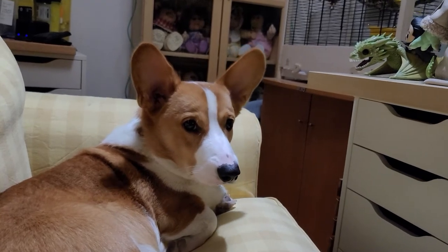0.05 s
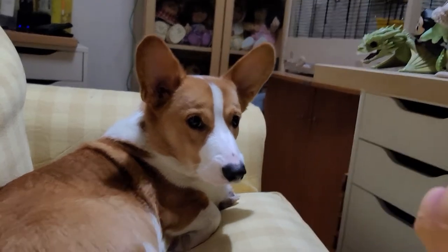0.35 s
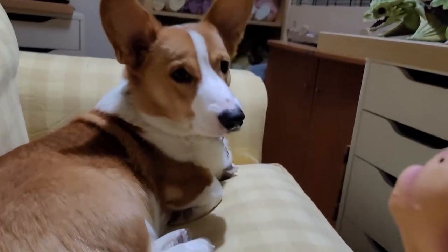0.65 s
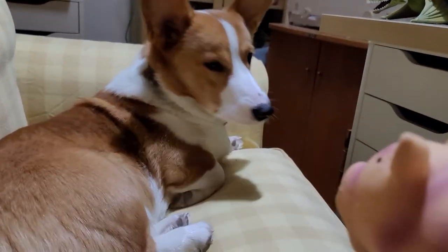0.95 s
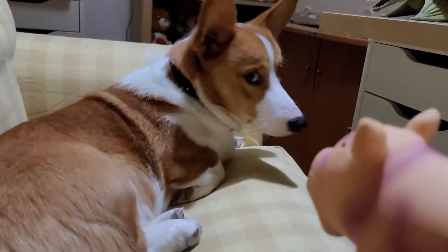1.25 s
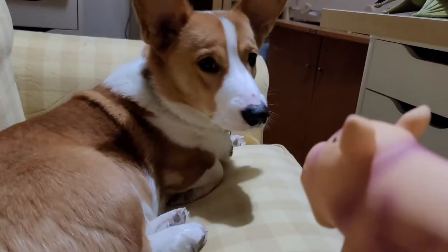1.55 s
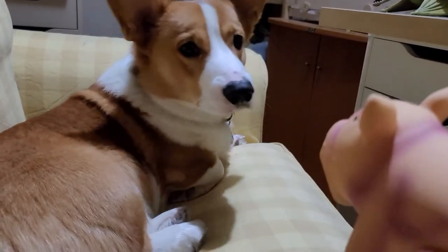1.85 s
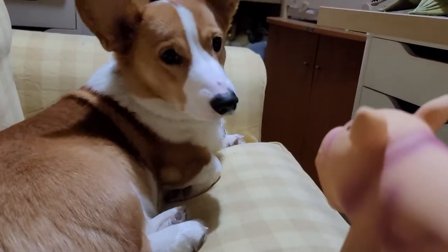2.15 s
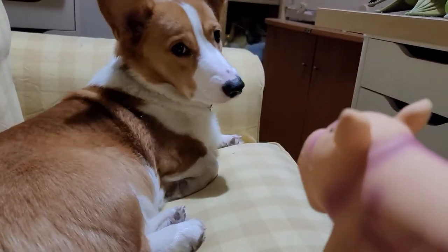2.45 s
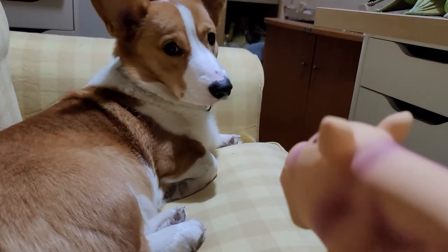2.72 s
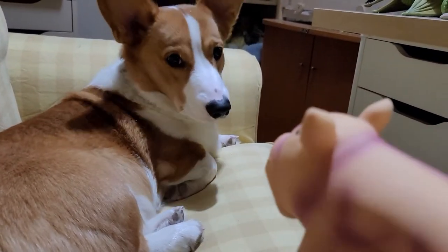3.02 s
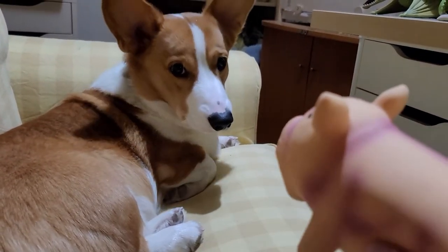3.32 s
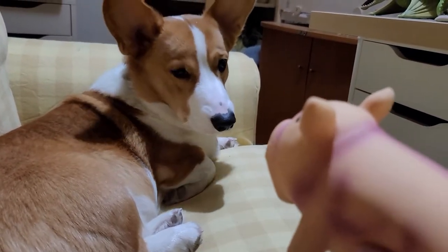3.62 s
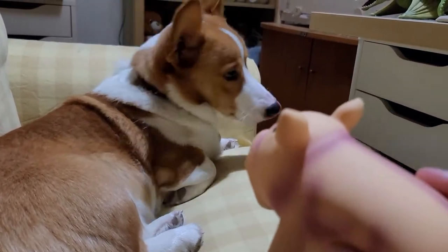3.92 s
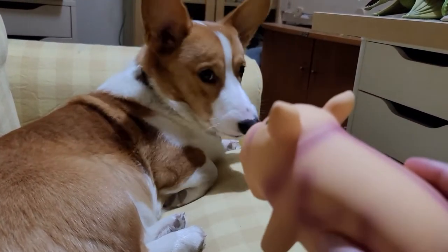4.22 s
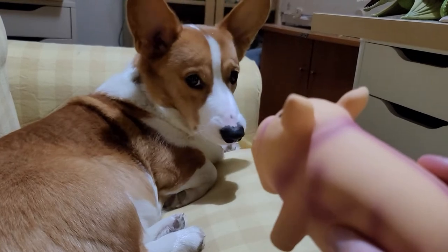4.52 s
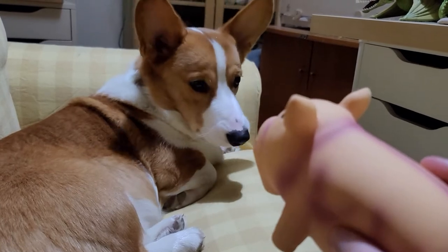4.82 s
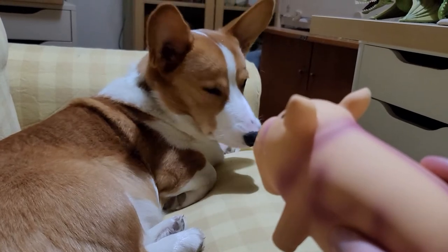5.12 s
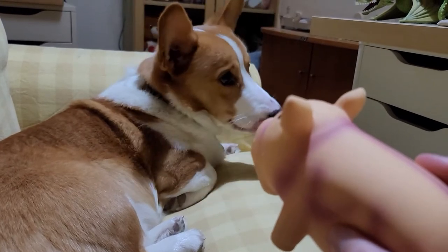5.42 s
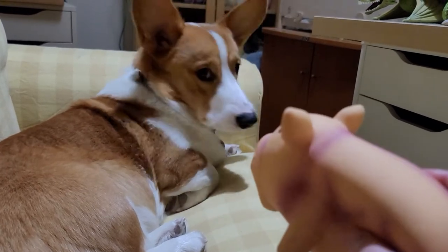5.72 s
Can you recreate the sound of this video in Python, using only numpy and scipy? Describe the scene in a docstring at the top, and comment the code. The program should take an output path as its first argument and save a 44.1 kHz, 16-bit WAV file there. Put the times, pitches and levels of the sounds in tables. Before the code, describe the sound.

A faint low hum fills a small living room throughout. Short, high, kiss-like squeaks come from slightly left, with a little room echo; each whistles downward and breaks into a wet, airy rasp. They fall right at the start, around 0.8 to 1.0 seconds, and near 1.5, 1.9 and 2.4 seconds, with faint sleeve brushes and small smacks between them. At 2.6 seconds a hand knocks softly on a hollow rubber pig toy, and at 2.7 seconds squeezes it close to the microphone: a dry tick and one short, low, buzzy oink with a raspy edge, standing out above the rest. Another cluster of chirps and squeaks runs from 3.4 to 3.8 seconds. A sharp smack follows at 4.0 seconds, then only a few faint smacks and ticks. At about 5.6 seconds the pig gives a second brief oink.

```python
"""A low hum fills a small living room. From the start, kiss-like squeaks come from one side: air forced
through a narrow wet slit whistles in falling glides, then breaks into a rasp. Soft knocks, a brushing
sleeve and small smacks fill the gaps. At 2.7 s a hand squeezes a rubber pig close by: its reed slaps
about 90 times a second and rings a short tube, giving an oink. More squeaks follow until about 3.8 s,
then a few smacks and ticks, and at 5.6 s the pig oinks again."""
import sys
import numpy as np
from scipy import signal
from scipy.fft import rfft, irfft, next_fast_len
from scipy.io import wavfile
from scipy.ndimage import uniform_filter1d, map_coordinates

SR = 44100
rng = np.random.default_rng(int(sys.argv[2]) if len(sys.argv) > 2 else 0)


def log_audio(samples):
    """Write samples as a 16-bit WAV file to the path given in sys.argv[1]."""
    # one column per channel
    frames = np.atleast_2d(samples).T
    # limit to full scale, then quantise
    limited = np.clip(frames, -1, 1)
    pcm = np.round(limited * 32767).astype(np.int16)
    wavfile.write(sys.argv[1], SR, pcm)


N = 258856
TIME = np.arange(N) / SR
TOP_HZ = 15900
OPPOSITE = np.array([[1], [-1]])  # adds on the left, subtracts on the right


def gain(db):
    """Turn decibels into a multiplier."""
    return 10 ** (np.asarray(db) / 20)


def unit(x):
    """Scale to an average strength (rms) of 1."""
    return x / np.sqrt(np.mean(x ** 2))


def add(track, s, sound):
    """Mix a sound into a track, starting at s seconds."""
    start = max(int(s * SR), 0)
    track[start:start + len(sound)] += sound[:max(N - start, 0)]


def delay(x, ms):
    """Make a sound late, even by part of a sample."""
    return map_coordinates(x, [np.arange(N) - ms * SR / 1000], order=3)


def resonate(x, hz, width):
    """Let a sound ring around one pitch by filtering it twice."""
    g, k = np.tan(np.pi * min(hz, TOP_HZ) / SR), width / hz
    b, a = [g * k, 0, -g * k], [1 + g * k + g * g, 2 * (g * g - 1), 1 - g * k + g * g]
    return signal.lfilter(b, a, signal.lfilter(b, a, x))


def colour(x, points):
    """Shape noise from bass to treble along (frequency [Hz], level [dB]) points."""
    hz, db = np.transpose(points)
    size = next_fast_len(N)
    bins = np.maximum(np.fft.rfftfreq(size, 1 / SR), 1)
    curve = gain(np.interp(np.log(bins), np.log(hz), db))
    return unit(irfft(rfft(x, size) * curve, size)[..., :N])


def wander(hz, size=N):
    """Drift to a new random value hz times a second."""
    steps = np.arange(size) * hz / SR
    targets = rng.standard_normal(int(steps[-1]) + 2)
    return unit(np.interp(steps, np.arange(len(targets)), targets))


def swell(peak, rise, fall):
    """A loudness curve that opens quickly, lingers at its peak and fades."""
    before, after = np.maximum(peak - TIME, 0) / rise, np.maximum(TIME - peak, 0) / fall
    return np.exp(-np.minimum(before ** 4 + after ** 2, 20))


def bursts(table):
    """Sudden puffs of noise, each ringing around one pitch and dying away."""
    out, t = np.zeros(N), TIME[:SR // 3]
    for s, db, decay, hz, width in table:
        burst = resonate(rng.standard_normal(len(t)) * np.exp(-t / decay), hz, width)
        add(out, s, gain(db) * burst / np.sqrt(np.sum(burst ** 2) / (decay * SR)))
    return out


# The tone of the room's noise: (frequency [Hz], relative level [dB])
HUM_COLOUR = [(15, -17.5), (25, -11.5), (42, 3), (63, -14.5), (90, -8), (150, -8.5), (230, -9.5),
              (330, -8.5), (640, -19.5), (1400, -22.5), (2100, -29), (6000, -41.5), (8400, -41),
              (9500, -52), (15500, -44)]
# Low notes at which the room rings: (pitch [Hz], width [Hz], level [dB])
ROOM_NOTES = [(79.8, 6.2, -68.5), (154.5, 23, -65), (316, 68, -70.5)]
def hum(level_db=-61, wander_db=1, apart_hz=900, bass_side=.2):
    """Low room noise with a few ringing notes; left and right differ mostly in the treble."""
    middle, side = colour(rng.standard_normal((2, N)), HUM_COLOUR) * gain(level_db + wander_db * wander(6))
    treble = signal.sosfilt(signal.butter(1, apart_hz, "high", fs=SR, output="sos"), side)
    notes = sum(gain(db) * unit(resonate(rng.standard_normal(N), hz, width))
                for hz, width, db in ROOM_NOTES)
    return middle + notes + (bass_side * side + 1.1 * treble) * OPPOSITE


def whistle(length, start_hz, end_hz, roughness, fade_db=0, bend=1.4, wobble=.08, wobble_hz=800,
            flutter_db=5.5, flutter_hz=500, overtone_db=-29, air_db=-11):
    """A tone that slides, then settles. Roughness (start, end) shakes it and lets air through."""
    progress = np.linspace(0, 1, int(length * SR))
    size, longest = len(progress), SR // 8
    rough = np.interp(progress, [0, 1], roughness)
    glide = end_hz + (start_hz - end_hz) * (1 - progress) ** bend
    hz = glide * (1 + wobble * rough * wander(wobble_hz, longest)[:size])
    phase = 2 * np.pi * np.cumsum(hz) / SR
    overtones = sum(np.sin(k * phase) * wander(wobble_hz, longest)[:size] * (k * hz < SR / 2)
                    for k in (2, 3))
    air = rough * unit(resonate(rng.standard_normal(longest)[:size], end_hz, width=.9 * end_hz))
    arch = np.sqrt(np.abs(np.sin(np.pi * progress)))  # fades in and out
    flutter = gain(flutter_db * rough * wander(flutter_hz, longest)[:size])
    tone = np.sin(phase) + arch * (gain(overtone_db) * overtones + gain(air_db) * air)
    return unit(tone * arch * flutter * gain(-fade_db * progress))


# Squeaks, each two whistles and a rasp: (peak time [s], rasp rise [s], rasp level [dB], low pitch [Hz],
# low level [dB], high pitch [Hz], high level [dB], roughness [0 = clean])
SLIT_SQUEAKS = [(0.032, 0.032, -29.5, 2783, -38, 3900, -37, 1.1),
                (0.99, 0.051, -29, 2700, -50, 5350, -34, 0.61),
                (1.517, .027, -31.5, 2646, -46.5, 5400, -44.5, .8),
                (1.932, 0.04, -35, 2950, -40, 5762, -30, 0.57),
                (2.464, 0.046, -31, 2960, -40, 5350, -40, 0.8),
                (3.559, 0.032, -28.5, 3963, -35, 5520, -37.5, 0.4),
                (3.731, 0.078, -30.5, 3200, -37.5, 5990, -31.5, 0.63)]
def whistles():
    """Just before it gives way, the slit whistles low, then high; both notes sag a little."""
    out = np.zeros(N)

    def note(hz, db, lead_s, length_s, fall_octaves):
        ratio = 2 ** (fall_octaves / 2)
        add(out, peak - lead_s, gain(db) * whistle(length_s, hz * ratio, hz / ratio, (rough, rough)))

    for peak, _, _, low_hz, low_db, high_hz, high_db, rough in SLIT_SQUEAKS:
        note(low_hz, low_db, lead_s=.057, length_s=.036, fall_octaves=.28)
        note(high_hz, high_db, lead_s=.04, length_s=.044, fall_octaves=.1)
    return out


# The tone of air rushing through the slit: (frequency [Hz], relative level [dB])
AIR_COLOUR = [(500, -37.5), (880, -29), (1150, -10.5), (1600, -8.5), (2100, -3.5), (4000, 2), (5500, -0.5),
              (8400, -13.5), (9500, -27.5), (11000, -18.5), (13300, -18), (15500, -20.5)]
def rasps(spurt_hz=500, spurt_db=6, spit_db=-4):
    """The slit flutters: quick uneven spurts of air, with spits that ring the hollow behind it."""
    out = np.zeros(N)
    air = colour(rng.standard_normal(N), AIR_COLOUR) * unit(gain(spurt_db * wander(spurt_hz)))
    for peak, rise, db, _, _, high_hz, _, _ in SLIT_SQUEAKS:
        wet = gain(spit_db) * spits(.938 * high_hz)  # just under the high whistle
        out += gain(db) * swell(peak, rise, fall=.36 * rise) * unit(air + wet)
    return out


def spits(hz, count=2400, spread=.22, ring_s=.0006, size_db=5):
    """Wet spits: tiny rings of uneven size scattered around one pitch, each sliding down a little."""
    out, t = np.zeros(N), TIME[:SR // 150]
    for s, (detune, size) in zip(rng.uniform(0, N / SR, count), rng.standard_normal((count, 2))):
        phase = 2 * np.pi * hz * np.exp(spread * detune) * t * (1 - 10 * t)
        add(out, s, gain(size_db * min(size, 2)) * t * np.exp(-t / ring_s) * np.sin(phase))
    return unit(out)


# Bumps of the hand: (time [s], level [dB], fade [s], pitch [Hz], width [Hz])
HAND_KNOCKS = [(0.37, -50.5, 0.12, 230, 201), (2.609, -39.5, 0.067, 325.6, 93.1),
               (2.612, -39.5, 0.096, 414, 49), (3.022, -36, 0.0022, 99.3, 110.6)]
def knocks():
    """The hand knocks softly on the pig's hollow body."""
    return bursts(HAND_KNOCKS)


# The tone of rubbing cloth: (frequency [Hz], relative level [dB])
CLOTH_COLOUR = [(900, -26), (1900, -2.5), (3000, -4.5), (4700, -1.5), (6500, -2), (8500, -11), (9600, -16),
                (13000, -10.5), (15500, -20)]
# Strokes of the sleeve: (peak time [s], rise [s], fall [s], level [dB])
SLEEVE_STROKES = [(0.46, 0.12, 0.073, -58.5), (1.78, 0.078, 0.023, -62), (5.562, 0.11, 0.06, -69)]
def sleeve(grain_db=2):
    """Sliding cloth makes a soft, slightly grainy hiss."""
    hiss = colour(rng.standard_normal(N), CLOTH_COLOUR) * gain(grain_db * wander(100))
    return hiss * sum(gain(db) * swell(s, rise, fall) for s, rise, fall, db in SLEEVE_STROKES)


# Falling chirps: (time [s], length [s], start pitch [Hz], end pitch [Hz], level [dB])
SLIT_CHIRPS = [(0.575, 0.025, 1330, 960, -57.5), (0.751, 0.025, 4620, 3850, -55.5),
               (0.783, 0.035, 3300, 2000, -53.5), (0.828, 0.044, 3220, 2014, -36.5),
               (0.878, 0.062, 2900, 2064, -37), (1.425, .027, 1230, 900, -55.5),
               (1.429, 0.052, 2090, 1697, -51), (1.752, 0.043, 4350, 3400, -53.5),
               (1.792, 0.028, 2940, 2345, -48.5), (1.834, 0.032, 2463, 1554, -46.5),
               (2.276, 0.093, 4260, 2590, -57), (2.357, .04, 2476, 1490, -45.5),
               (3.393, 0.043, 3750, 3320, -42), (3.466, 0.055, 3097, 2140, -40),
               (3.634, 0.035, 3594, 3264, -30), (3.645, 0.026, 2970, 2300, -36)]
def chirps(spray_db=-15):
    """The tight slit whistles downward; each chirp starts clean and breaks up in a spray of air."""
    out, air = np.zeros(N), colour(rng.standard_normal(N), AIR_COLOUR)
    for s, length, start_hz, end_hz, db in SLIT_CHIRPS:
        add(out, s, gain(db) * whistle(length, start_hz, end_hz, roughness=(.05, .9), fade_db=8))
        out += gain(db + spray_db) * air * swell(s + length, length / 2, length / 2)
    return out


# Small smacks: (time [s], level [dB], fade [s], pitch [Hz], width [Hz])
SMALL_SMACKS = [(0.583, -52.5, 0.0066, 2050, 1900), (1.427, -53.5, 0.023, 3240, 6900),
                (2.092, -42.5, 0.016, 1720, 1380), (2.100, -42.5, 0.0081, 2580, 1860),
                (3.198, -47, 0.0047, 4700, 7000), (3.990, -36.5, 0.014, 3300, 4900),
                (3.991, -53.5, 0.012, 13000, 5000), (3.996, -34.5, 0.0068, 1700, 1340),
                (4.182, -49.5, 0.0077, 1480, 1190), (4.708, -61.5, 0.0048, 3980, 5970),
                (4.72, -60, 0.0061, 3310, 694), (5.275, -53, 0.025, 1583, 1440)]
def smacks():
    """Short, bright pops of noise between and after the squeaks."""
    return bursts(SMALL_SMACKS)


# Ticks of the rubber: (time [s], level [dB], fade [s], pitch [Hz], width [Hz])
RUBBER_TICKS = [(2.609, -51.5, 0.018, 4550, 8450), (2.697, -30.5, 0.0025, 4300, 3575),
                (4.412, -62, 0.0023, 7300, 9000), (4.664, -46.5, 0.0024, 3910, 700),
                (5.637, -36, 0.0071, 3900, 2910)]
def ticks():
    """The pig's rubber gives dry ticks and cracks."""
    return bursts(RUBBER_TICKS)


# Squeezes of the pig: (time [s], hold [s], slap rate [Hz], force [dB])
PIG_SQUEEZES = [(2.6838, .068, 92.6, 0), (5.6215, .05, 93, -.8)]
def reed(attack_s=.035, start_db=-31.5, release_s=.064, end_db=-34, sag_hz_per_s=370,
         scatter_db=2, jitter_s=.00017):
    """Air flaps the reed, a thin tongue. Gives its closings (time [s], force [dB]) and a force curve."""
    closings, force = [], np.zeros(N)
    for s, hold, rate_hz, force_db in PIG_SQUEEZES:
        t = np.arange(0, attack_s + hold + release_s, 1 / SR)
        built = np.minimum(t / attack_s, 1)  # the hand closes
        spent_s = np.maximum(t - attack_s - hold, 0)  # the air runs out
        db = force_db + start_db * (1 - built) ** 1.2 + end_db * (spent_s / release_s) ** 1.21
        hurry = 1 + .26 * (1 - built ** 4)  # the reed runs faster until it swings fully
        cycles = np.cumsum(rate_hz * hurry - sag_hz_per_s * spent_s) / SR
        times = np.interp(np.arange(cycles[-1]), cycles, t)
        late, harder = rng.standard_normal((40, 2))[:len(times)].T
        closings += zip(s + times + jitter_s * late, np.interp(times, t, db) + scatter_db * harder)
        add(force, s, gain(db))
    return closings, force


def clicks(closings, growth):
    """A click each time the reed shuts, growth dB louder for each dB of force."""
    out, taps = np.zeros(N), np.arange(-8, 9)
    for s, db in closings:
        add(out, s, gain(growth * db) * np.sinc(taps - s * SR % 1) * np.hanning(len(taps)))
    return out


def oink_body(closings, tube_db=26, belly_db=23, puff_db=15, bounce_ms=.93, bounce_db=-7):
    """The reed's slaps bounce once in the tube and ring its lowest note, each with a low puff."""
    slaps = clicks(closings, growth=.74)
    slaps = slaps + gain(bounce_db) * delay(slaps, bounce_ms)
    tube = gain(tube_db) * resonate(slaps, hz=1060, width=540)
    puff = gain(puff_db) * resonate(slaps, hz=320, width=280)
    # The chopped airflow drives the belly even when the reed barely shuts.
    belly = gain(belly_db) * resonate(clicks(closings, growth=.13), hz=148, width=95)
    return tube + belly - puff


# High notes at which the reed's tube rings: (pitch [Hz], width [Hz], relative level [dB])
TUBE_NOTES = [(1580, 750, -32), (2840, 340, -21.5), (4204, 480, -11.5), (4446, 200, -21), (5210, 410, -23),
              (6994, 900, -20), (7600, 1700, -31.5), (10600, 2500, -36.5), (13800, 3000, -35.5)]
def oink_edge(closings, force, edge_db=26, leak_db=-24, leak_s=.003, air_db=-51, air_spread_s=.12):
    """The reed's tip snaps shut last and air hisses past it; both ring the tube's high notes."""
    snaps = clicks(closings, growth=1.1)
    leak = signal.lfilter([1], [1, -np.exp(-1 / (leak_s * SR))], snaps)  # a short tail on each snap
    # Air moves before the reed starts and after it stops.
    flow = np.sqrt(np.abs(uniform_filter1d(force, int(air_spread_s * SR))))
    hiss = (gain(leak_db) * leak + gain(air_db) * flow) * rng.standard_normal(N)
    tip = delay(snaps, ms=.3) + hiss
    return sum(gain(edge_db + db) * resonate(tip, hz, width) for hz, width, db in TUBE_NOTES)


def room(x, fade_s=.26, treble_fade_s=.24, gap_s=.0012):
    """A blur of echoes off the walls, different left and right; the treble dies sooner."""
    t = TIME[:SR // 2]
    noise = rng.standard_normal((2, len(t)))
    low = signal.sosfilt(signal.butter(2, 6000, fs=SR, output="sos"), noise)
    tail = (low * gain(-60 * t / fade_s) + (noise - low) * gain(-60 * t / treble_fade_s)) * (t > gap_s)
    tail /= np.sqrt(np.sum(tail ** 2, axis=1, keepdims=True))
    return signal.fftconvolve(x[None], tail, axes=1)[:, :N]


def place(x, direct_db, room_db, left_db, left_late_ms):
    """Direct sound reaches one side first; the room's long, low waves reach both alike."""
    direct = np.array([delay(x, left_late_ms), x]) * gain(direct_db + OPPOSITE * left_db / 2)
    left, right = room(x)
    side = signal.sosfilt(signal.butter(1, 700, "high", fs=SR, output="sos"), (left - right) / 2)
    return direct + gain(room_db) * ((left + right) / 2 + side * OPPOSITE)


def scene():
    """The pig is close, its treble aimed at the room; the squeaks come mostly by way of the walls."""
    closings, force = reed()
    body = oink_body(closings) + knocks()
    mix = place(body, direct_db=-7, room_db=-17.5, left_db=2, left_late_ms=-.099)
    edge = oink_edge(closings, force) + ticks()
    mix += place(edge, direct_db=-3, room_db=-8.5, left_db=5, left_late_ms=-.045)
    off_to_the_side = chirps() + whistles() + rasps() + smacks() + sleeve()
    mix += place(off_to_the_side, direct_db=-8, room_db=1, left_db=6, left_late_ms=.14)
    return mix + hum()


def record(dry):
    """The phone cuts off the highest treble."""
    return signal.sosfilt(signal.ellip(10, .2, 80, TOP_HZ, fs=SR, output="sos"), dry)


dry = scene()
out = record(dry)
log_audio(out)
```